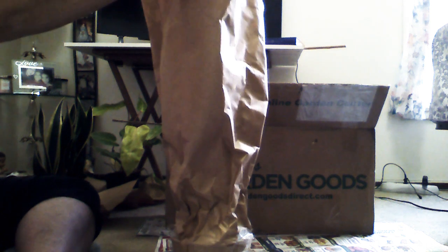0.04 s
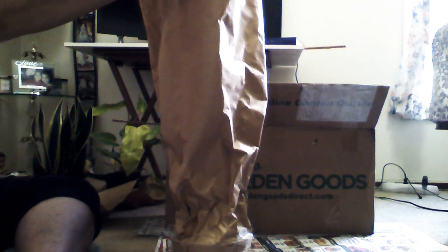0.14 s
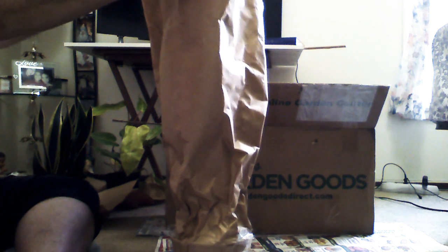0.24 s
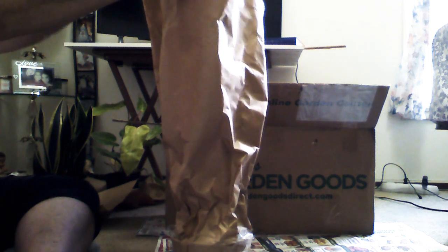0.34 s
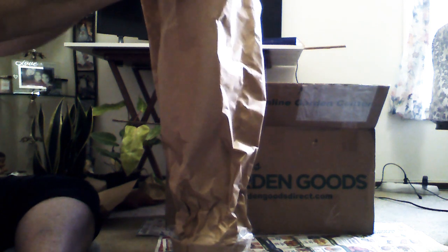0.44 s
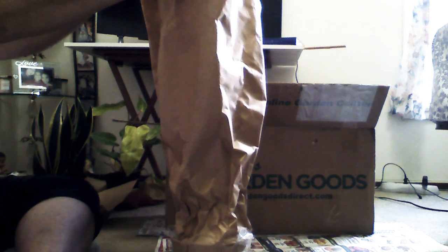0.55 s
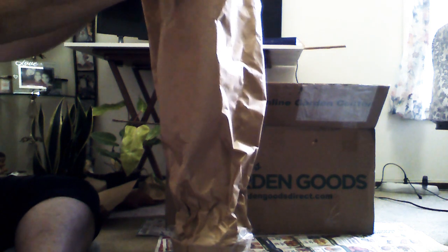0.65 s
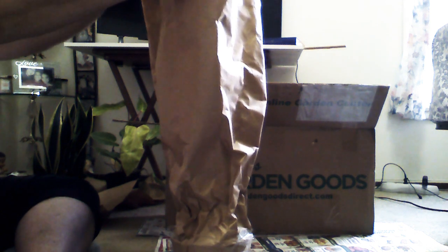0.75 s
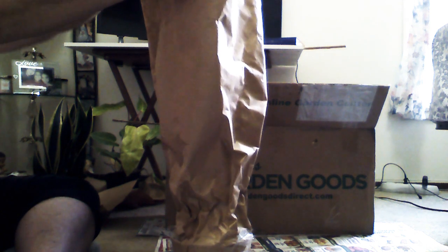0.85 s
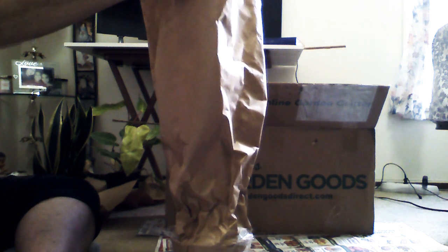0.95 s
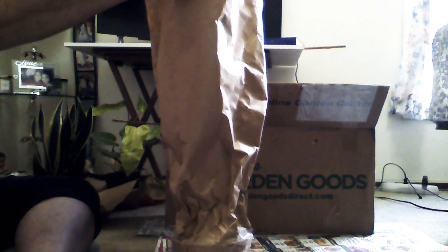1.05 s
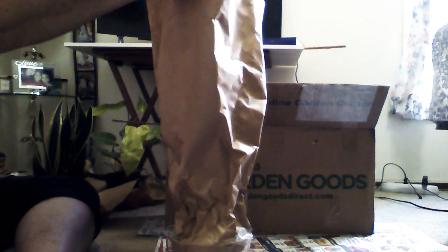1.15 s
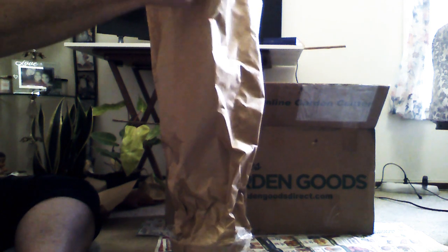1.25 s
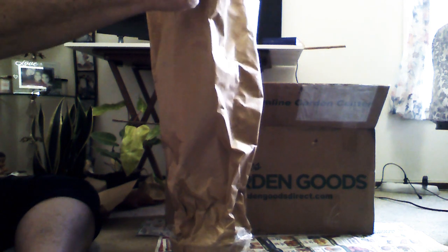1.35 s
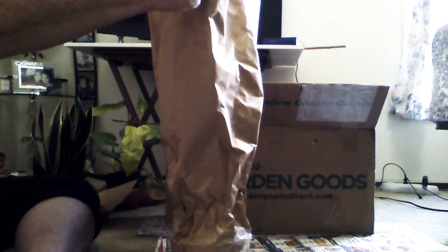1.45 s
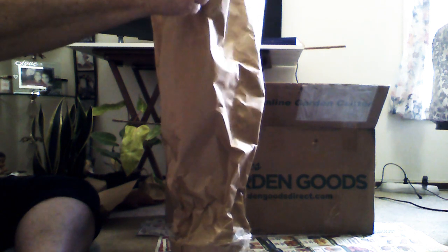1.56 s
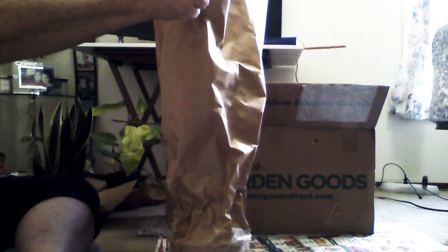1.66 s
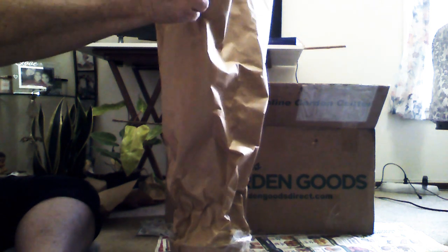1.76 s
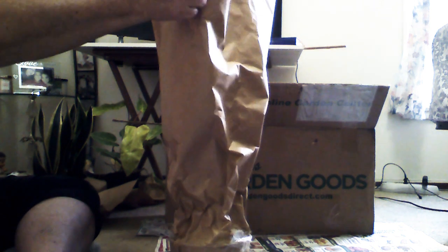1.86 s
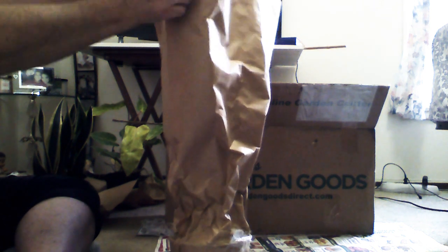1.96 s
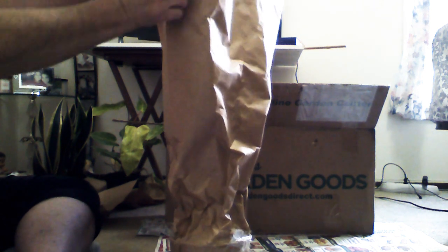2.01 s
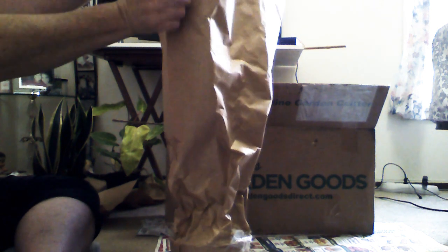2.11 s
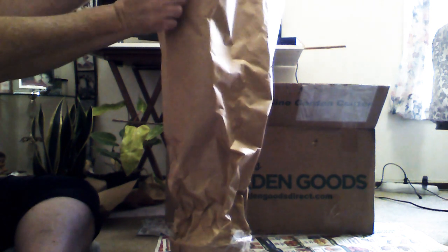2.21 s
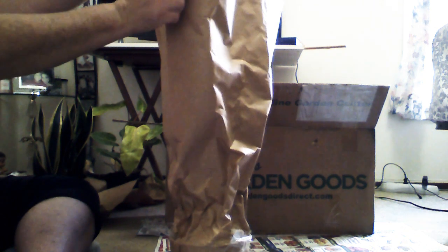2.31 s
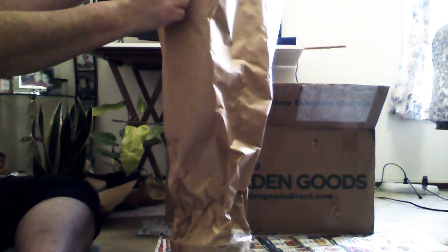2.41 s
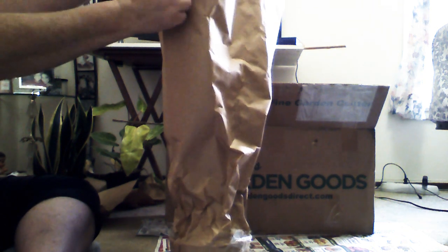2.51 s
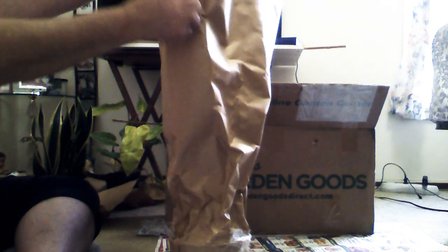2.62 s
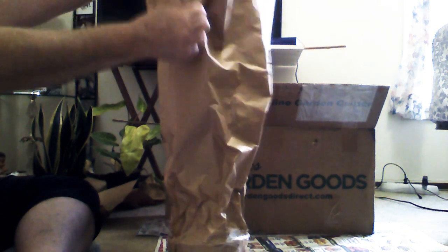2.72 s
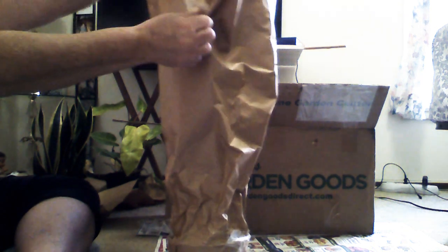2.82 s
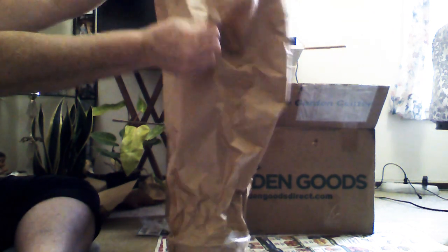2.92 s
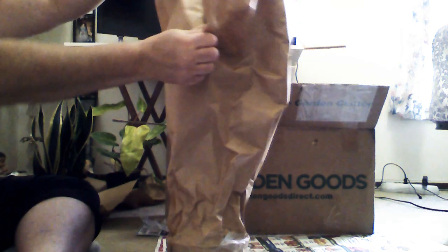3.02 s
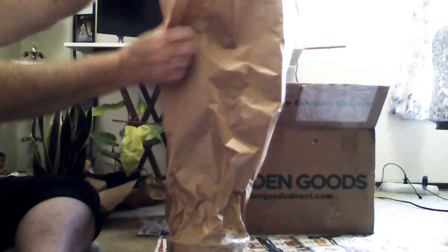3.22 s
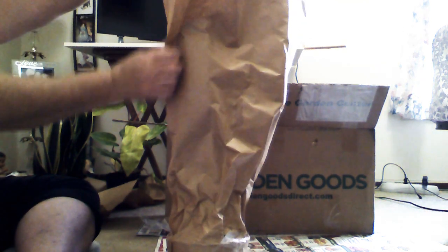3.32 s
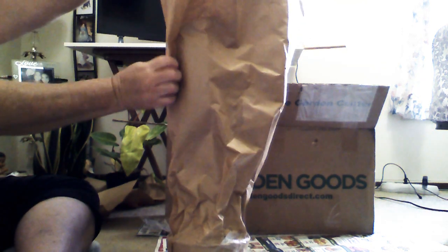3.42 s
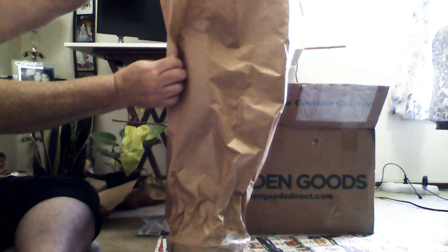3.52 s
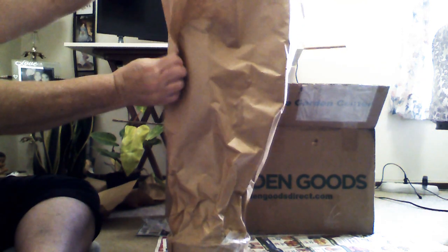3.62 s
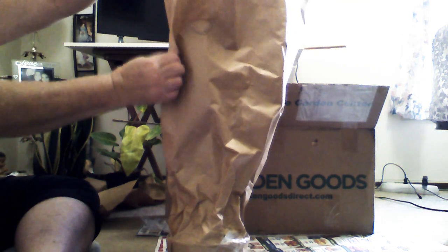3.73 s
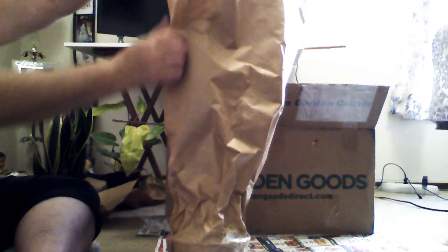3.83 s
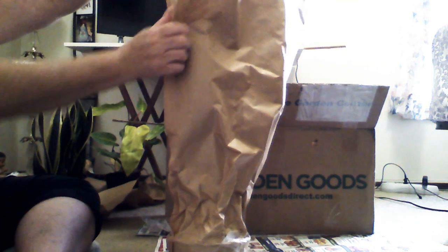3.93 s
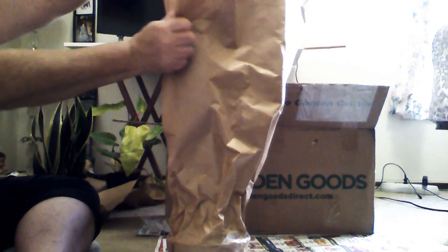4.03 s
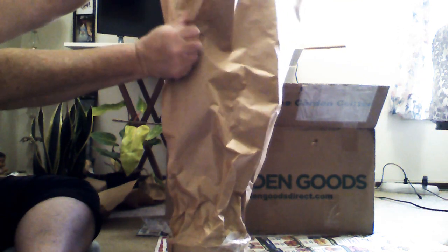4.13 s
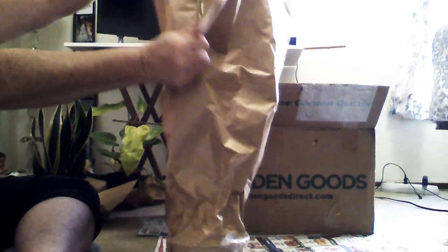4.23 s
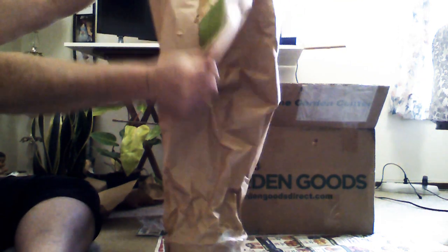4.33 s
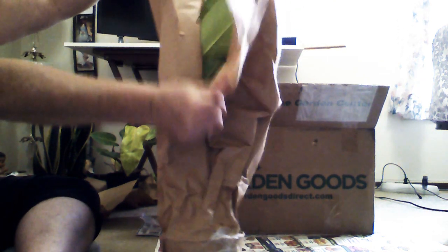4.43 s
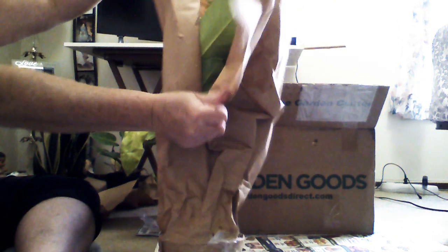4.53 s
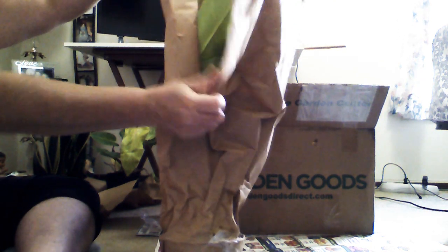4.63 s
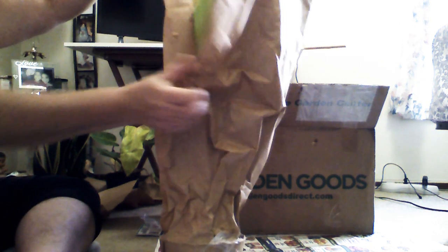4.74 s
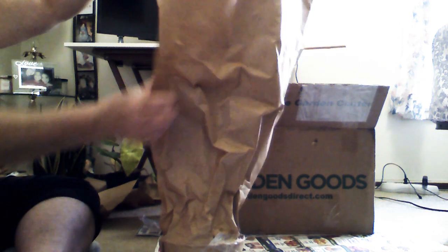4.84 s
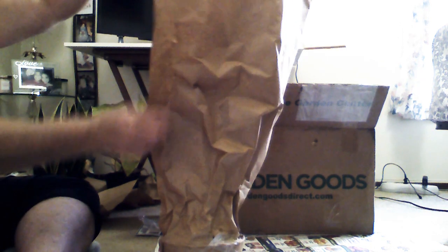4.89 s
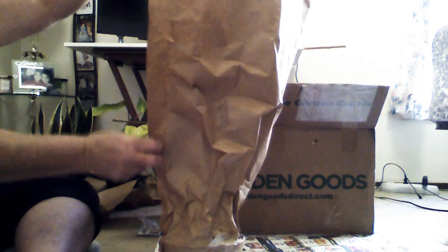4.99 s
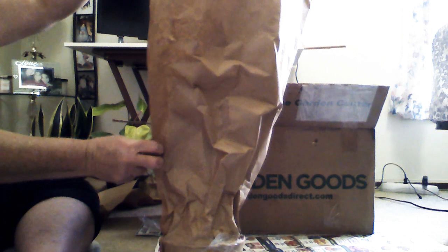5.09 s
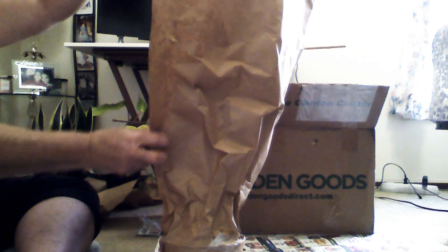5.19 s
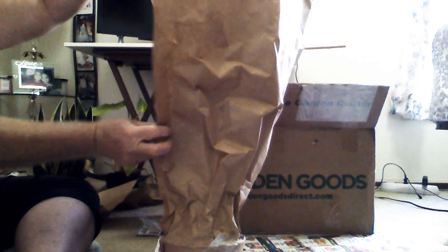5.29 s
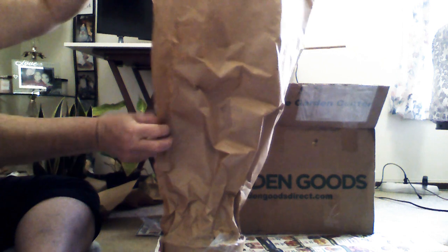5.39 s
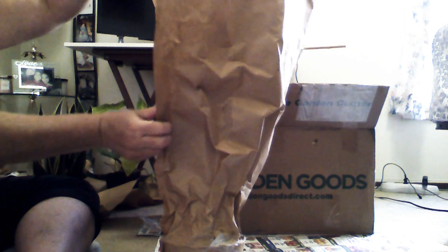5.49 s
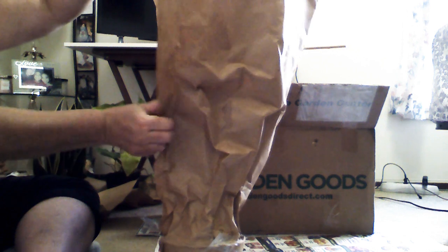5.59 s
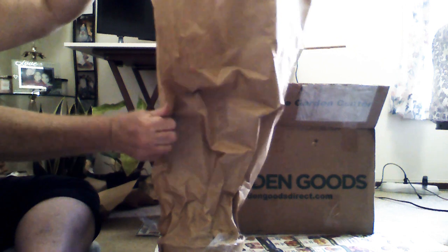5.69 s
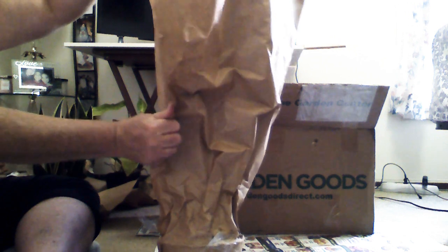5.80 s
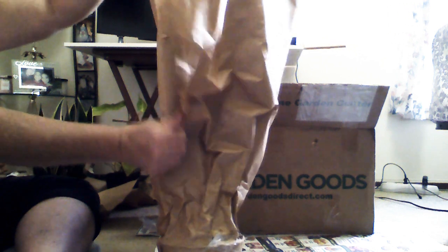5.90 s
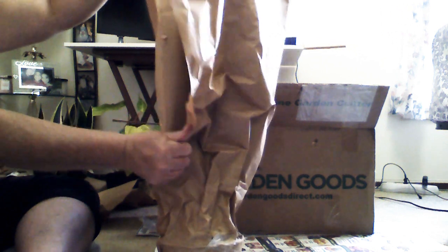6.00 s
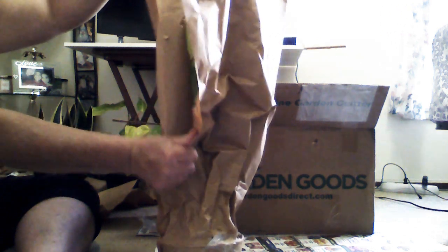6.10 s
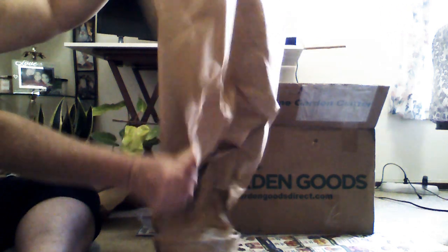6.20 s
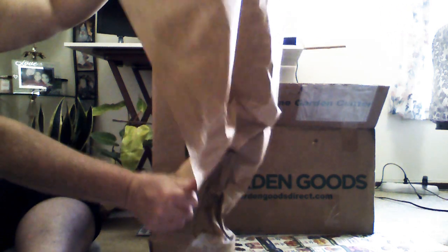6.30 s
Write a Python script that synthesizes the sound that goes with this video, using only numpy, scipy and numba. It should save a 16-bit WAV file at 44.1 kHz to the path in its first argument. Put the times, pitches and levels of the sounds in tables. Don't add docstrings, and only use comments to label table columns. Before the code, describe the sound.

Thick brown paper crinkles and crumples in uneven bursts, with crisp pops and near-quiet gaps between pulls in a furnished room.

```python
import sys
import numpy as np
from scipy import signal
from scipy.fft import rfft, irfft, next_fast_len
from scipy.io import wavfile
from scipy.ndimage import uniform_filter1d, minimum_filter1d, map_coordinates
from numba import njit

SR = 44100
rng = np.random.default_rng(int(sys.argv[2]) if len(sys.argv) > 2 else 0)


def gain_from_db(level_db):
    decades = np.asarray(level_db, float) / 20
    return 10 ** decades


def transcribe(signal):
    frames = np.atleast_2d(signal).T
    limited = np.clip(frames, -1, 1)
    pcm = np.round(limited * 32767).astype(np.int16)
    wavfile.write(sys.argv[1], SR, pcm)


N = 280035


def unit(x):
    return x / np.sqrt(np.mean(x ** 2) + 1e-20)


def along(points, hz):
    f, v = np.transpose(points)
    return np.interp(np.log(hz + 1), np.log(f + 1), v)


def wobble(rate, s):
    knots = rng.standard_normal(int(N * rate / SR) + 4)
    return map_coordinates(knots, [s * rate], mode="nearest")


def noise(spectrum):
    m = next_fast_len(N + 8192)
    colour = gain_from_db(along(spectrum, np.fft.rfftfreq(m, 1 / SR)))
    return unit(irfft(rfft(rng.standard_normal(m)) * colour, m)[:N])


@njit
def add(out, start, size, turn, life):
    for g in range(len(start)):
        z = size[g] + 0j
        for i in range(start[g], min(start[g] + life[g], len(out))):
            out[i] += z.imag
            z *= turn[g]


def facets(s, db, hz, cycles):
    out = np.zeros(N)
    start = np.clip(s * SR, 0, N - 1).astype(np.int64)
    size = gain_from_db(db) * np.sign(rng.standard_normal(np.shape(db)))
    turn = np.exp((2j * np.pi - 1 / cycles) * hz / SR)
    life = (6 * cycles * SR / hz).astype(np.int64)
    add(out, start.ravel(), size.ravel(), turn.ravel(), life.ravel())
    return out


def pitches(u):
    low_hz, top_hz = 90, 16000
    return low_hz * (top_hz / low_hz) ** u


def facet_db(hz, panels_db, creases_db):
    # f/Hz, level per Hz [dB]
    paper_tone = [(53, -43), (90, -21), (214, -17.5), (330, 3), (376, -0.5), (488, 8), (661, -26),
                  (876, -4), (1190, -3), (1830, 5.5), (5180, -2), (8350, -14), (15000, -19.5), (16000, -28)]
    panels = np.clip(np.log2(900 / hz), 0, 1)
    creases = np.clip(np.log2(hz / 4500), 0, 1)
    return along(paper_tone, hz) + 20 * np.log10(hz / 2000) + panels * panels_db + creases * creases_db


def snaps(count=240, ringing=4, spread=.0021):
    # t/s, peak level/dB, ring f/Hz, big panels level/dB
    cracks = [(1.218, -10.5, 2860, -31.5), (1.382, -16, 2662, -26), (1.266, -2.5, 990, -10.5),
              (1.352, -10, 2328, -7), (1.445, -6, 980, -49), (2.66, -23.5, 1384, -36.5),
              (2.681, -11.5, 3100, -22.5), (2.692, -12, 721, -31), (2.711, -8, 1928, -23),
              (2.738, -7.5, 1930, -27.5), (2.752, 3, 874, -27.5), (2.772, -1, 907, -12),
              (2.987, -15, 1510, -12), (3.022, -23, 1283, -3), (3.049, -6, 881, -22), (3.069, -4, 1360, -5),
              (4.323, -14.5, 2380, -33), (4.335, -15.5, 1768, -34), (4.364, -9.5, 1860, -22),
              (4.412, -2, 1340, -28.5), (4.499, -6.5, 1747, -14), (5.956, -26.5, 2600, -33),
              (6.006, -16.5, 1990, -44), (6.016, -10, 1900, -20), (6.052, -6.5, 1560, -12.5),
              (6.191, -14.5, 2600, -35), (6.22, -5, 2050, -45), (6.237, -3, 2000, -34),
              (6.25, -0.5, 5370, -36), (6.267, 0.5, 1750, -7.5)]
    crisp = [(1.225, -2, 1380, -22), (1.679, -10.5, 2480, -55), (1.73, -16.5, 2310, -28),
             (1.778, -21, 2350, -25), (1.795, -14, 2160, -18), (1.823, -14.5, 2360, -35),
             (2.335, -7.5, 2397, -34), (2.975, -19, 900, -14), (3.436, -5, 1320, -33.5),
             (4.095, -32, 2200, -9), (4.27, -21, 2460, -43), (4.688, -33, 420, 5),
             (4.822, -25.5, 1340, -12.5), (5.047, -40, 1410, -11), (5.085, -36.5, 1420, -19),
             (5.94, -29, 1305, -41), (6.179, -16.5, 3260, -32)]
    plain = [
        (1.561, -8.5, 1862, -14.5),
        (1.985, -14, 1860, -36),
        (2.09, -21.5, 2277, -49),
        (2.189, -18.5, 2480, -8.5),
        (2.464, -20.5, 2275, -37),
        (3.287, -21.5, 1380, -21),
        (3.604, -15.5, 1807, -21),
        (4.719, -4, 3560, -38),
        (6.1, -5.5, 3430, -37),
    ]
    dull = [(0.025, -27.5, 1340, -32), (0.035, -25, 1330, -7.5), (0.078, -23, 2300, -21),
            (0.394, -35, 2500, -27), (1.955, -25.5, 1400, -10.5), (2.059, -25, 2700, -8.5),
            (2.151, -21, 2530, -23), (2.271, -21.5, 2180, -38), (2.573, -15.5, 2010, -27),
            (3.165, -12, 1340, -36), (3.953, -12.5, 1870, -10), (4.13, -27, 1210, -26.5),
            (4.191, -24, 3050, -13.5), (4.212, -26.5, 2240, -25), (4.649, -20, 1240, -13)]
    ticks = [(.262, -38, 1280, -8), (0.293, -39.5, 1420, -30), (0.425, -46.5, 2255, -6),
             (0.617, -62, 1700, -22), (0.878, -59, 910, -15), (.941, -39, 2270, -34),
             (1.114, -48, 567, -11), (1.14, -40, 1310, -14), (1.154, -34, 1400, -18.5),
             (1.181, -35, 910, -19), (3.357, -26, 1300, -41), (3.821, -34.5, 2110, -18),
             (4.128, -38, 506, -22), (4.956, -31.5, 1338, -16), (1.207, -23, 900, -21),
             (5.135, -42, 1390, -21), (5.174, -51.5, 1250, -17), (5.297, -43.5, 1410, -38),
             (5.373, -42.5, 2130, -36), (5.442, -55, 1390, -28), (5.458, -43, 1474, -36),
             (5.69, -35.5, 1840, -32.5), (5.721, -33, 1420, -23.5), (5.73, -32, 1820, -36),
             (0.056, -45, 2300, -32)]
    # fine creases/dB, ring/dB, aftershocks/dB
    timbres = [
        (-20, 0.5, -1),
        (-15, -2, 3.5),
        (-23.5, 0.5, -0.5),
        (-37.5, 5, 1.5),
        (-28.5, 5.5, -2),
    ]
    kinds = cracks, crisp, plain, dull, ticks
    s, peak_db, ring_hz, panels_db = np.vstack(kinds).T[:, :, None]
    creases_db, ring_db, after_db = np.repeat(timbres, [len(k) for k in kinds], axis=0).T[:, :, None]

    lag, size, u = np.moveaxis(rng.random((len(s), count, 3)), 2, 0)
    hz = pitches((np.arange(count) + u) / count)

    after_s, after_fade_db = .07, 20
    after = np.arange(count) % 2 == 1
    late = spread * ((-np.log(1 - lag)) ** .75 * 1.4 - .2)
    late = np.where(after, after_s * lag, late)
    spray_db = peak_db - 21 + facet_db(hz, panels_db + 19, creases_db + 22) + 16 * (size - .7)
    spray_db = spray_db + after * (after_db - after_fade_db * lag)
    small = hz > 900
    fine = facets((s + late)[small], spray_db[small], hz[small], cycles=2.1)
    broad = facets((s + late)[~small], spray_db[~small], hz[~small], cycles=2.1)

    near_hz = ring_hz * (1 + .25 * (lag[:, :ringing] - .5))
    near_db = peak_db + ring_db - 13 + 6 * (size[:, :ringing] - .5)
    ring = facets(s + late[:, -2 * ringing::2], near_db, near_hz, cycles=3)
    no_bass = signal.butter(3, 650, "high", fs=SR, output="sos")
    return broad + signal.sosfilt(no_bass, fine + ring)


def force(s):
    hauls = [(1.251, -16, .04, 0.18, -13.5), (1.393, -15.5, .08, 0.11, -18),
             (1.454, -20.5, .05, 0.04, -1.5), (1.56, -22.5, .008, .006, -27), (2.697, -24, .045, .12, -2),
             (2.75, -10, .016, .1, -12.5), (2.796, -13, .04, 0.12, -5.5), (3.088, -9, .09, 0.024, -4.5),
             (3.952, -15, 0.0085, 0.023, -7.5), (4.369, -13.5, .05, 0.2, -16.5),
             (4.43, -15.5, .06, 0.098, -10), (4.535, -9.5, .08, 0.087, -5.5), (4.72, -18.5, .008, 0.026, 2),
             (6.053, -16.5, .055, 0.067, -12.5), (6.264, -7.5, .055, 0.11, -15.5),
             (6.34, -14.5, .08, 0.0089, -1)]
    drags = [(.01, -45, 0.17, .1, -1.5), (.08, -42.5, .008, .03, -10), (1.677, -39, .012, .2, -27.5),
             (1.822, -31, .07, .055, -29.5), (2.0, -40.5, .055, .2, -4), (2.19, -49, .07, .13, -6),
             (2.28, -44, .05, .04, -13.5), (2.568, -39.5, .004, .2, 1.5), (3.164, -29, .01, .25, -19),
             (3.301, -40.5, .1, .1, -11.5), (3.356, -27, .02, .04, -18.5), (3.93, -47.5, 0.24, .01, -18),
             (4.013, -50, .03, .11, -9.5), (4.273, -31.5, .006, .1, -26.5), (4.629, -35, .05, .05, 0.5),
             (4.259, -46.5, .03, .01, -25.5), (4.87, -48, .12, 0.14, -22), (5.08, -63, 0.13, .08, -22),
             (5.736, -48, .06, .04, -17.5), (5.806, -51.5, .06, .04, -21), (5.944, -40, .005, .1, -15.5),
             (6.159, -43, .05, .08, -27.5)]
    peak_s, db, rise, fall, panels_db = np.transpose(hauls + drags)[:, :, None]
    grid = np.arange(0, N / SR, 1 / 1000)
    away = np.where(grid < peak_s, (peak_s - grid) / np.abs(rise), (grid - peak_s) / np.abs(fall))
    curve = 1.09
    power = gain_from_db(2 * np.maximum(db - 20 * away ** curve, -150))
    total = power.sum(0)
    share_db = (power * panels_db).sum(0) / total
    return [np.interp(s, grid, v) for v in (10 * np.log10(total), share_db)]


def crumple(count=36000, spike_db=3.5, clump_db=2.1):
    when, size, u = rng.random((3, count))
    s = when * N / SR
    hz = pitches(u)
    now_db, panels_db = force(s)
    creases_db = -18 - 0.3 * np.maximum(now_db, -45)
    clumps = clump_db * (wobble(90, s) + 0.33 * wobble(300, s))
    spikes = -spike_db * np.log(1 - .99 * size)
    db = facet_db(hz, panels_db + 10, creases_db + 14) + spikes + clumps
    swell = gain_from_db(force(np.arange(N) / SR)[0] - 5)
    return swell * unit(facets(s, db, hz, cycles=1.4))


def room(x, block=4096):
    # delay t/s, level/dB
    echoes = [
        (.005, -13.5),
        (0.012, -6.5),
        (0.024, -12.5),
        (0.038, -16),
    ]
    # f/Hz, t60/s
    decay = [(150, 0.047), (600, 0.39), (2000, 0.33), (6000, 0.33), (14000, 0.36)]
    out, t = np.zeros(N + block + SR), np.arange(SR // 3) / SR
    for a in range(0, N, block):
        hz, frames, z = signal.stft(rng.standard_normal(SR // 3), SR, nperseg=256)
        fading = z * gain_from_db(-60 * frames / along(decay, hz)[:, None])
        tail = signal.istft(fading, SR, nperseg=256)[1][:len(t)]
        tail = gain_from_db(-2.5) * tail * (1 - np.exp(-t / 0.0022)) / np.linalg.norm(tail)
        early = 0
        for delay_s, db in echoes:
            off = np.abs(t - delay_s - rng.normal(0, 0.00071))
            early = early + gain_from_db(db - 15.5) * np.exp(-off / 0.0011)
        wet = signal.fftconvolve(x[a:a + block], tail + early * rng.standard_normal(len(t)))
        out[a:a + len(wet)] += wet
    return out[:N]


def suppressed(x, knee_db=-59):
    power = np.abs(uniform_filter1d(x ** 2, size=400))
    return x * np.sqrt(power / (power + gain_from_db(2 * knee_db)))


def follow(loud_db, t):
    return signal.lfilter([1 / (t * SR)], [1, 1 / (t * SR) - 1], loud_db)


def background(paper):
    # f/Hz, level per Hz [dB]
    rustle_tone = [(47, -36.5), (80, -24.5), (222, -22.5), (643, -13), (1120, -17), (1370, -4.5),
                   (1600, -13), (2660, -14.5), (4140, -21.5), (16000, -21.5)]
    hiss_tone = [(50, -39), (85, -8.5), (183, -9.5), (213, -4), (254, -12.5), (560, -4), (682, -17.5),
                 (849, -6), (1180, -10.5), (16000, -17.5)]
    rumble_tone = [(20, -14), (45, -5), (75, -2.5), (160, -9), (260, -13.5), (400, -39)]
    # f/Hz, level/dB
    mains = [
        (60, -5),
        (162, -14),
    ]
    s = np.arange(N) / SR

    shut_db, open_at_start_db = -70, -43
    power = np.abs(uniform_filter1d(paper ** 2, size=400)) + gain_from_db(2 * shut_db)
    loud_db = 10 * np.log10(power) - open_at_start_db
    quick = follow(loud_db, 0.043) + open_at_start_db
    slow = follow(loud_db, 0.18) + open_at_start_db
    hold = int(.42 * SR)
    held = -minimum_filter1d(-slow, size=hold, origin=(hold - 1) // 2, mode="nearest")
    held = uniform_filter1d(held, size=SR // 12)
    rustle_db = np.minimum(-28 + 0.37 * quick + 0.38 * held, -50)
    hum_db = -27 + 0.44 * quick + 0.37 * held

    rustle = gain_from_db(rustle_db - 2 + 1.5 * wobble(40, s) + 1.5 * wobble(150, s)) * noise(rustle_tone)
    hum = gain_from_db(-8.5) * noise(rumble_tone)
    for hz, db in mains:
        hum += gain_from_db(db + 0.89 * wobble(35, s)) * np.sin(2 * np.pi * hz * s + .4 * wobble(5, s))
    hiss = gain_from_db(-78 + 0.88 * wobble(30, s)) * noise(hiss_tone)
    heave_db = -23 + 1.59 * uniform_filter1d(force(s)[0], size=SR // 16)
    thump = gain_from_db(heave_db + 3 * wobble(20, s)) * noise(rumble_tone)
    return thump + rustle + gain_from_db(hum_db) * hum + hiss


def scene():
    thin_sheet = signal.butter(1, 220, "high", fs=SR, output="sos")
    paper = signal.sosfilt(thin_sheet, crumple() + snaps())
    heard = gain_from_db(-1.0) * paper + suppressed(room(paper))
    return (heard + background(heard))[None]


def low_pass(x):
    return signal.sosfilt(signal.butter(12, 16590, fs=SR, output="sos"), x)


def record(dry):
    thin = signal.sosfilt(signal.butter(2, 28, "high", fs=SR, output="sos"), dry)
    soft = thin / (1 + np.abs(thin / .97) ** 6) ** (1 / 6)
    narrow = signal.sosfiltfilt(signal.cheby2(16, 60, 16300, fs=SR, output="sos"), soft)
    return low_pass(narrow)


dry = scene()
out = record(dry)
transcribe(out)
```